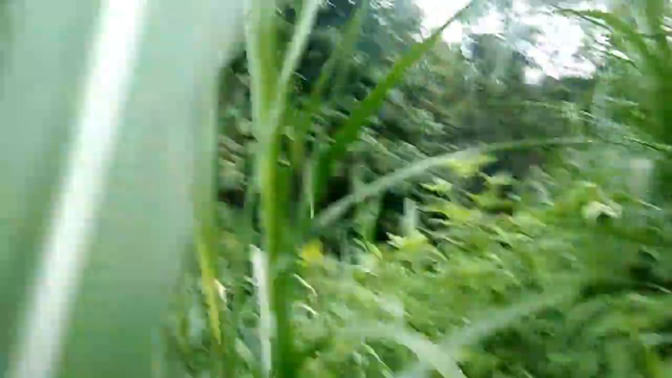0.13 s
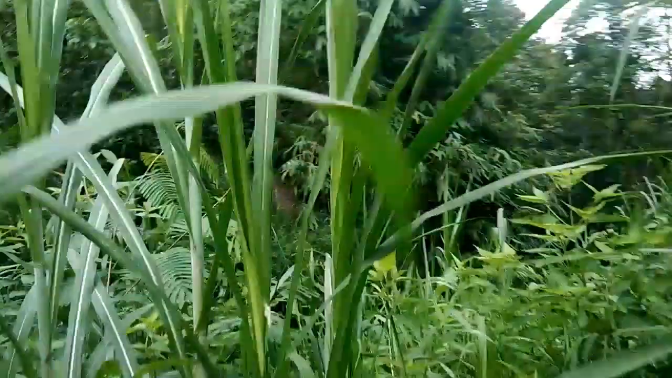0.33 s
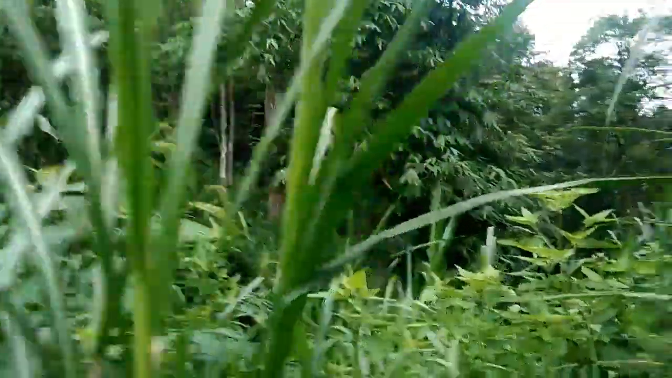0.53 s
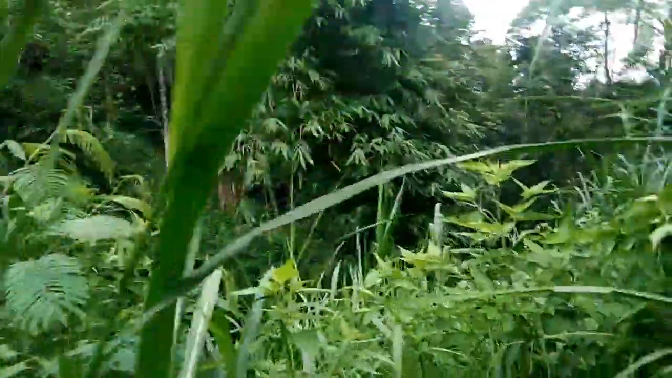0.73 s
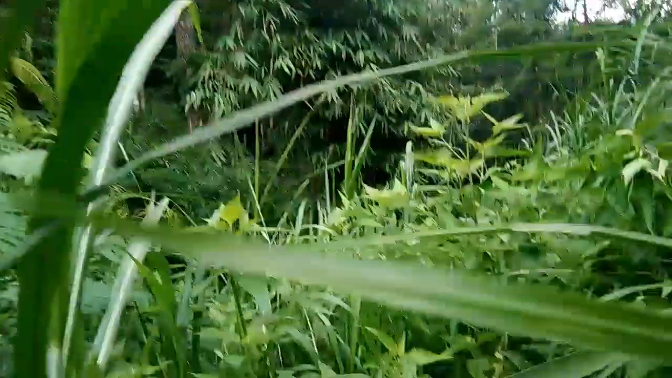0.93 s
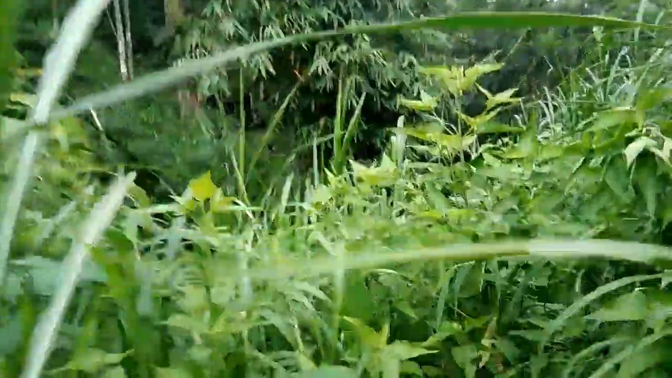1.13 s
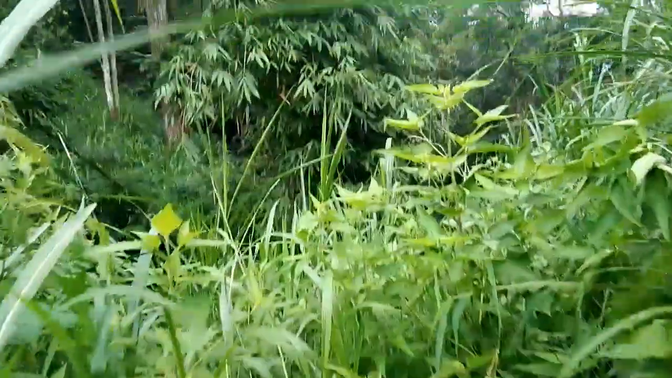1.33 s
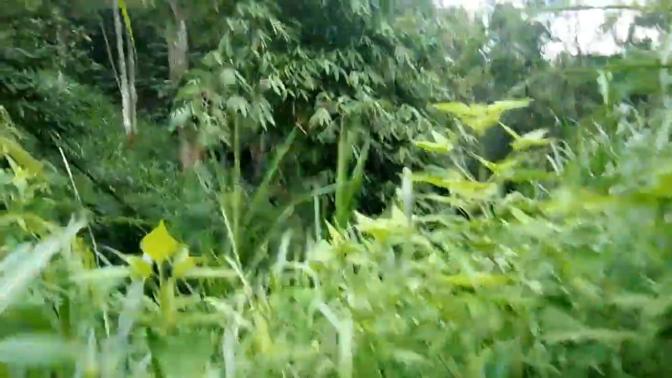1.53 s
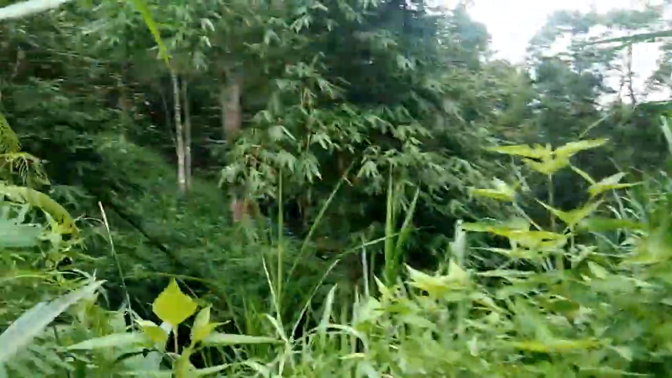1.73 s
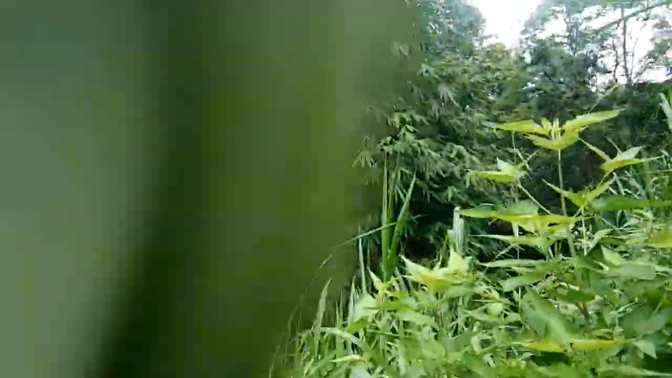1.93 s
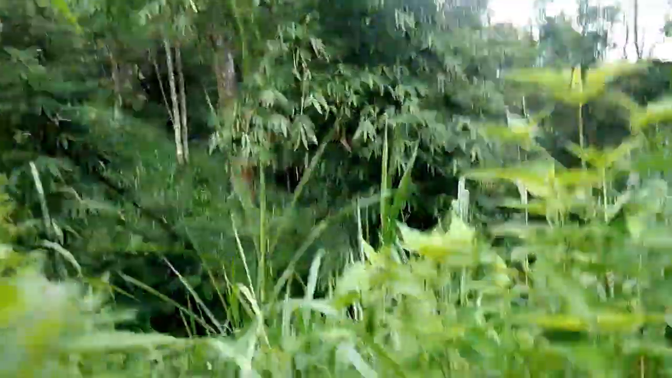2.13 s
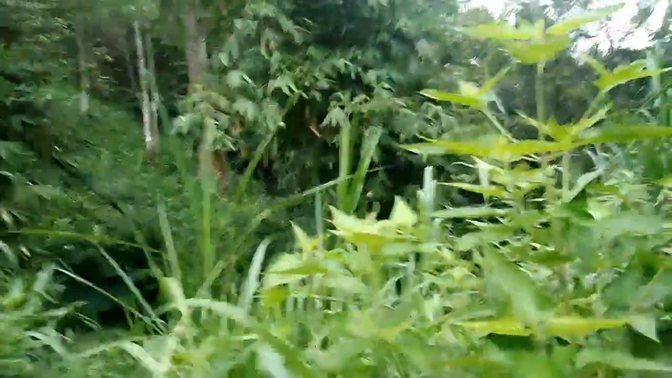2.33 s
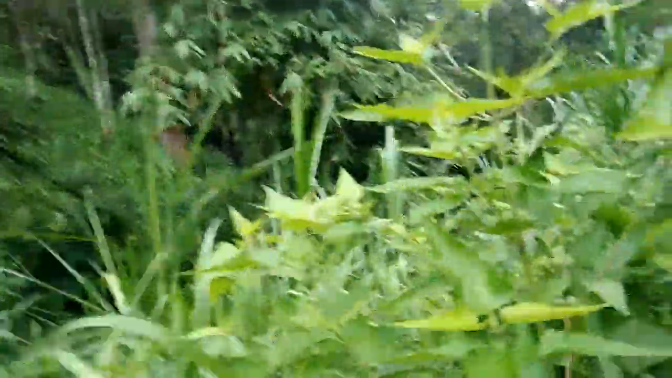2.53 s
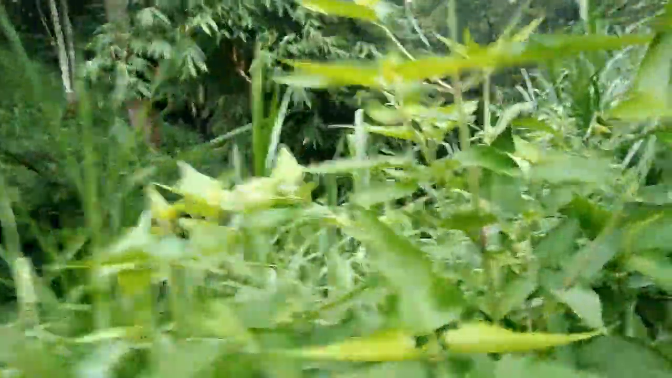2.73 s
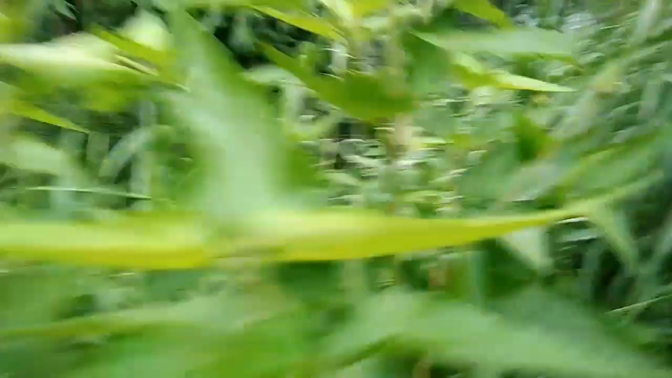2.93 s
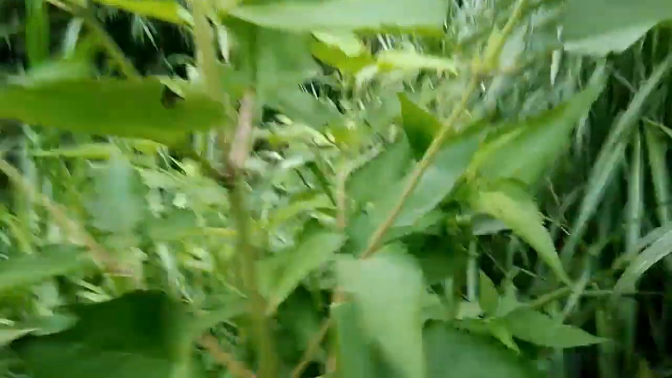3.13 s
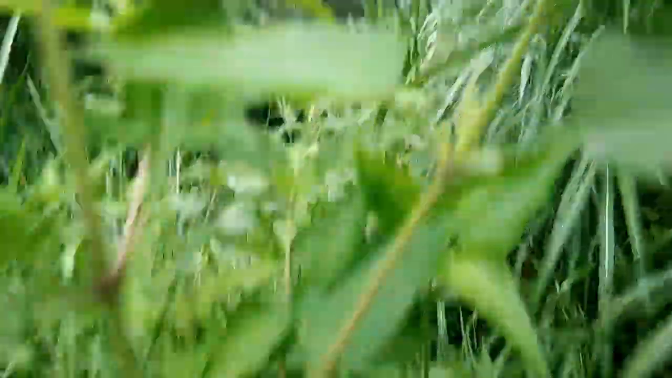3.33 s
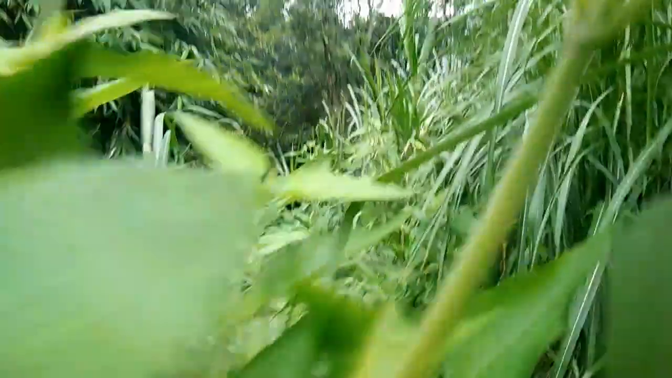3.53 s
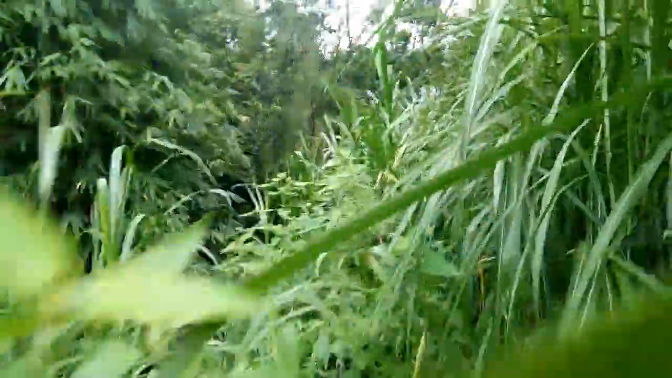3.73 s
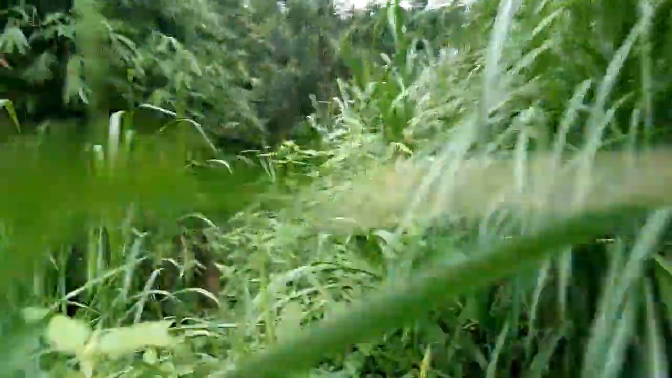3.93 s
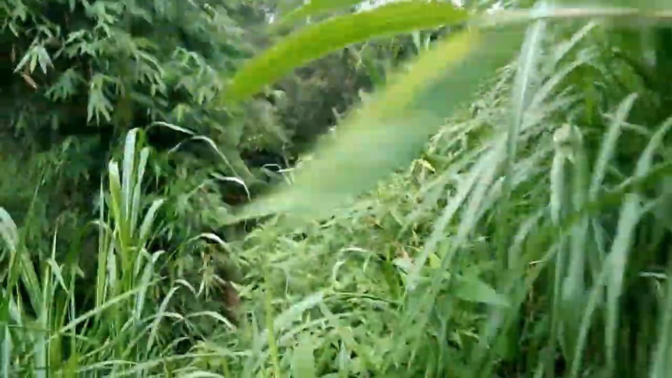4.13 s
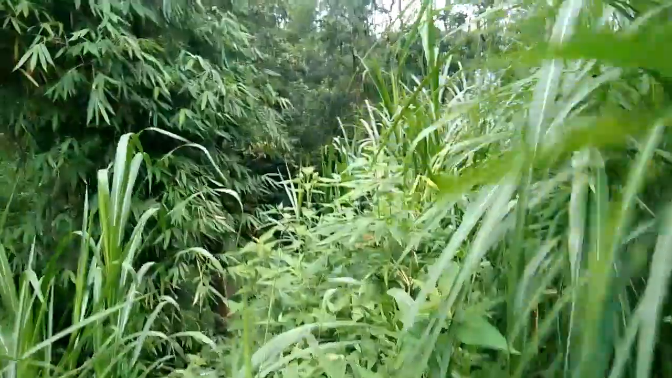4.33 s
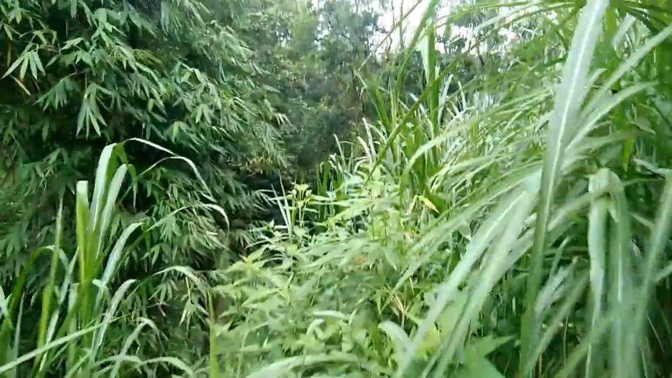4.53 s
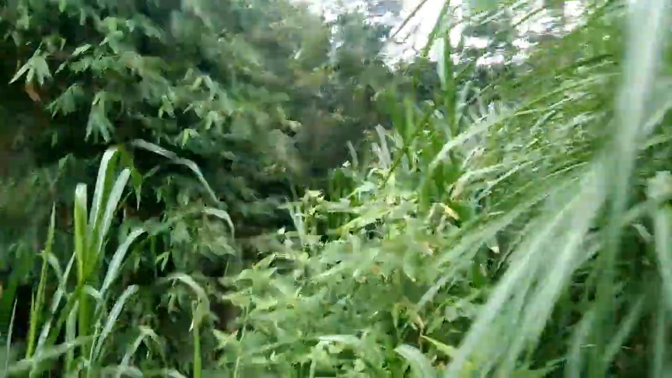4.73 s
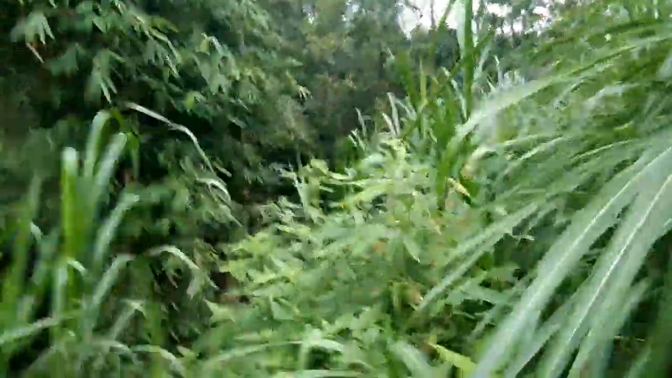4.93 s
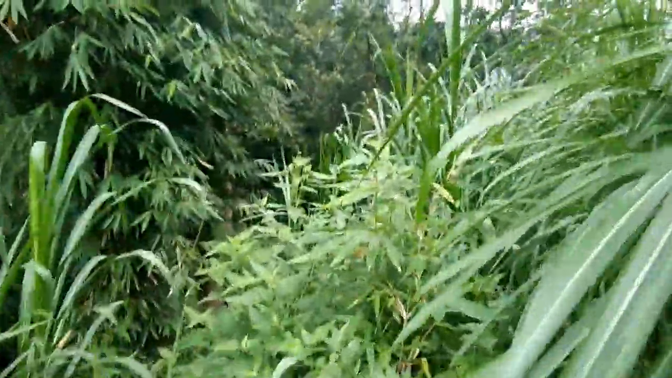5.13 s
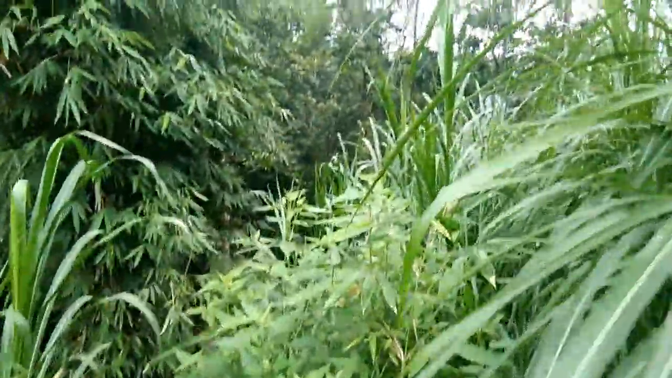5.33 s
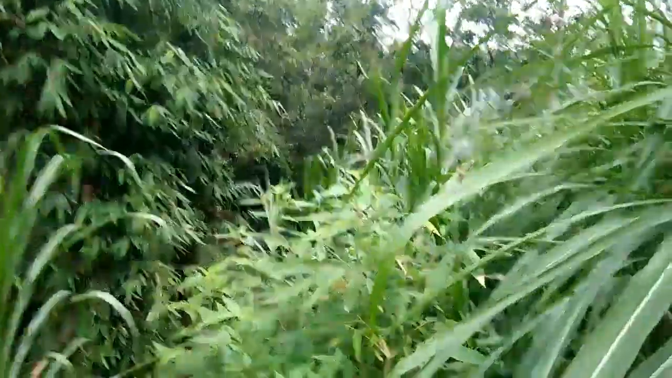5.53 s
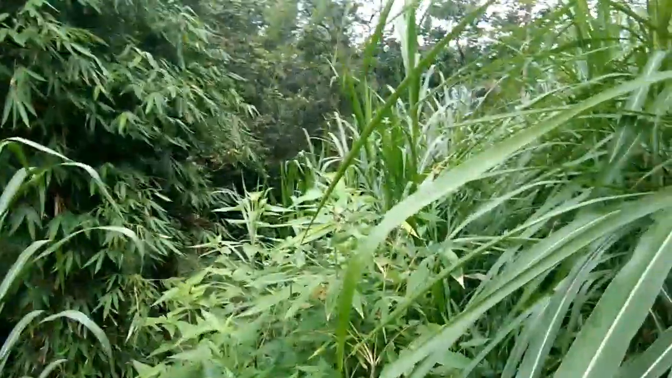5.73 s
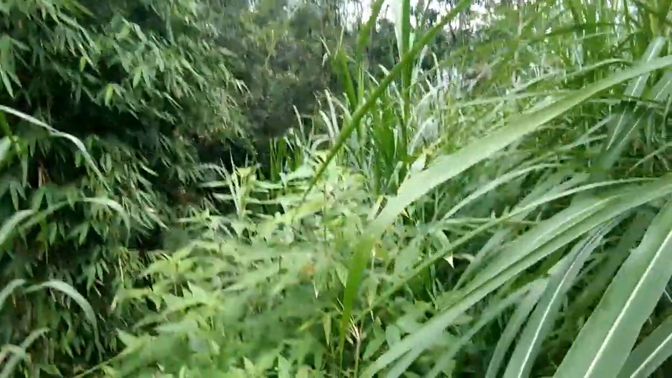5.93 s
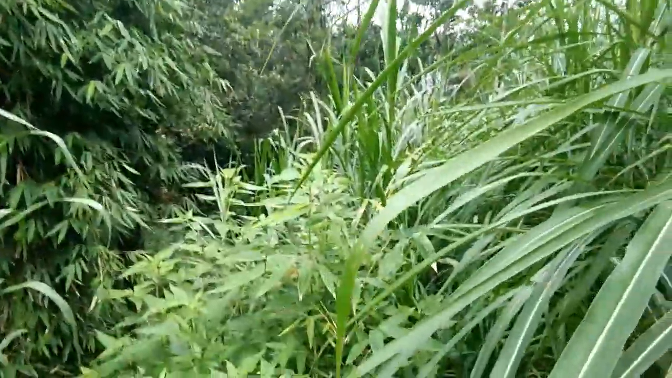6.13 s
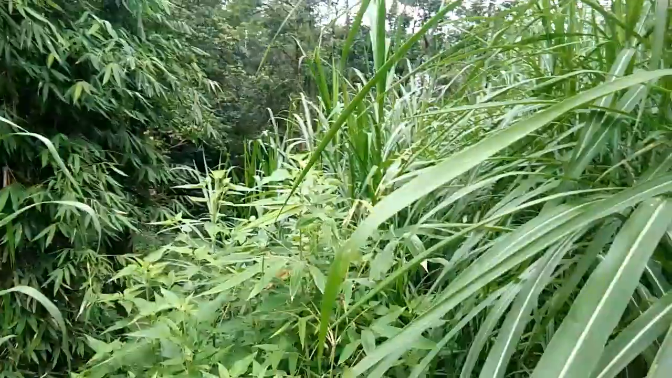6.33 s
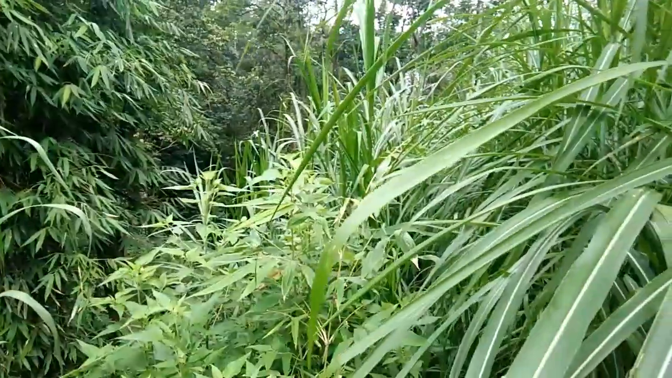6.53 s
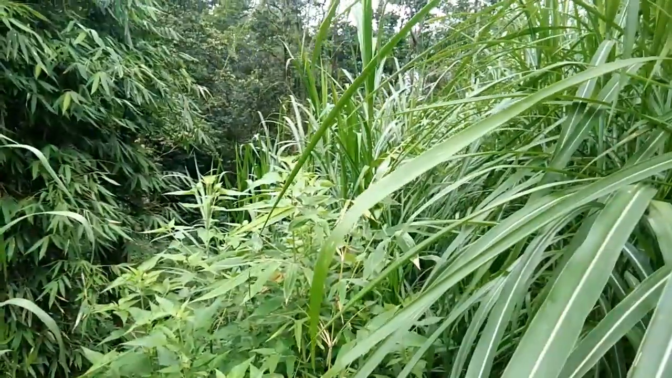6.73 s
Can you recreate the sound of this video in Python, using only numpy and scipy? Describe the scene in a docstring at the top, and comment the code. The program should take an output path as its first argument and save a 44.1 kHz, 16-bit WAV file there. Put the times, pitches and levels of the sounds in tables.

```python
"""A hissing, crackling rustle is heard first: a camera is pushed through tall grass and leafy undergrowth.
Stick-slip friction sounds as blades slide, broad leaves flap and stems drag; single blades snap or
scrape on the housing. Early on a stalk bumps the camera and a saw-edged blade zips over it. The rustle
fades out, ever faster, at the end. One microphone with a resonant port hears it all."""
import sys
import numpy as np
from scipy import signal
from scipy.fft import rfft, irfft, next_fast_len
from scipy.io import wavfile
from scipy.ndimage import uniform_filter1d, map_coordinates

SR = 44100
rng = np.random.default_rng(int(sys.argv[2]) if len(sys.argv) > 2 else 0)


def wrap_up_sound(samples):
    """Save the sound to the file named by the first command line argument, as 16-bit audio."""
    columns = np.atleast_2d(samples).T
    # keep every value between -1 and 1, then stretch to whole-number steps
    tamed = np.clip(columns, -1, 1)
    steps = np.round(tamed * 32767).astype(np.int16)
    wavfile.write(sys.argv[1], SR, steps)


N = 298292

# how hard the camera is pushed through the plants: t/s, effort/dB
PUSH_EFFORT = [(0, -39), (0.2, -35.5), (0.4, -37.5), (0.55, -39), (0.82, -41.5), (0.96, -37), (1.13, -36.5),
               (1.3, -38.2), (1.6, -34), (1.85, -34), (2.04, -33.5), (2.2, -34.5), (2.42, -32.5),
               (2.58, -35), (2.76, -38.5), (3.1, -40), (3.6, -41.5), (4.1, -41), (4.36, -42.5),
               (4.58, -41.5), (5.14, -43), (5.48, -40.5), (5.9, -44.5)]
# friction spectra of sliding blades, dry blades, broad leaves and stems: f/Hz, gain/dB
HISS_SPECTRUM = [(1500, -52), (3500, -12.5), (5300, -1.5), (9000, 3.5), (16000, -3)]
BLADE_SPECTRUM = [(700, -33), (1500, -9), (2400, -1.5), (3800, -1.5), (6000, -3), (12000, -23.5)]
LEAF_SPECTRUM = [(150, -31.5), (350, -3.5), (520, -2), (760, -1.5), (1200, 0), (2000, -3.5), (4000, -15.5)]
STEM_SPECTRUM = [(20, -7.5), (50, -12), (80, -2.5), (125, -1.5), (190, -0.5), (360, -0.5), (600, -4),
                 (1500, -27.5)]
# long blades sweeping along the housing: t/s, duration/s, hiss level/dB, crackle level/dB
BLADE_SWEEPS = [(0.055, 0.16, -37, -50), (.235, .11, -31, -35.5), (.58, 0.33, -42.5, -58),
                (1.01, 0.078, -38, -42), (1.492, 0.073, -36, -42), (1.752, 0.19, -30.5, -35),
                (2.35, 0.24, -33, -41.5), (2.864, .05, -38, -50), (3.16, 0.28, -47, -44.5),
                (3.76, 0.043, -43, -40.5), (4.07, 0.17, -48, -44.5), (4.5, .06, -42, -48),
                (4.7, .1, -45, -45), (5.209, 0.074, -36, -46), (5.315, 0.063, -35, -40.5),
                (5.449, 0.11, -35, -39.5), (5.728, 0.033, -36.5, -42.5), (5.905, 0.024, -40, -52),
                (6.185, 0.075, -51.5, -58), (6.362, 0.022, -52, -57), (6.443, 0.022, -73, -75)]
# leafy shoots bent aside: t/s, duration/s, leaf flap level/dB, stem drag level/dB
BENT_SHOOTS = [(0.218, .04, -45, -42), (0.293, 0.056, -30.5, -41), (.64, 0.24, -45, -51),
               (1.284, 0.072, -41, -62), (1.85, 0.26, -44, -48), (2.33, .03, -43, -48),
               (2.56, .06, -50, -48.5), (2.92, 0.12, -46, -52), (3.13, 0.26, -47, -53),
               (3.4, 0.26, -58, -55), (3.8, 0.13, -52, -64), (4.06, 0.12, -52, -54), (4.64, 0.25, -50, -69),
               (5.203, 0.084, -46, -64), (5.35, 0.022, -48, -53), (5.46, .1, -58, -64),
               (5.7, 0.03, -46, -62), (6.168, 0.024, -51, -71), (6.28, 0.024, -63, -77),
               (6.364, .012, -58.5, -80), (6.448, 0.019, -71.5, -84.5)]
# blades and leaves scraping the housing, plus two low rumbles near 110 Hz as stems drag past: t/s, duration/s,
# relative level/dB, f/Hz, quality factor Q
HOUSING_SCRAPES = [(.066, 0.009, -32, 8000, 0.6), (.133, 0.0078, -19, 10500, 0.58),
                   (.134, 0.006, -24.5, 2270, 2.5), (.141, 0.0059, -23, 9880, 1),
                   (0.279, .019, -27, 1300, 1.3), (.3314, .005, -15.5, 8430, 1.4),
                   (.338, .008, -21.5, 7100, 1), (0.336, .008, -23, 1550, 4),
                   (0.3653, 0.013, -26.5, 1378, 3), (.412, .022, -27.5, 766, 3),
                   (.413, 0.021, -30, 1800, 4.6), (.458, 0.042, -39, 110, 2.1),
                   (0.584, 0.029, -42, 110, 2.2), (2.077, .008, -29, 3300, 3.5),
                   (2.599, 0.072, -42, 553, 2.5), (3.136, 0.18, -46, 340, 3.7), (3.168, 0.12, -44, 1300, 3),
                   (3.849, 0.39, -50, 1250, 4.7), (4.671, 0.034, -40.5, 1290, 4.5),
                   (4.812, 0.022, -33, 11000, 2), (5.2, 0.2, -50.5, 420, 2.1),
                   (5.368, 0.022, -31, 8500, 0.77), (5.692, 0.012, -28.5, 11000, .64),
                   (5.712, 0.032, -44, 1300, 3), (5.778, 0.024, -33, 9000, 0.76),
                   (5.908, .0041, -24.5, 11000, 1.1)]
# blades flicking the housing: t/s, relative level/dB, f/Hz
BLADE_SNAPS = [(.0733, -26, 2800), (.4122, -20, 1840), (1.072, -26, 7920), (1.431, -21.5, 5300),
               (2.0757, -20.5, 3000), (2.159, -27, 6000), (2.258, -23, 5000), (2.345, -34, 882),
               (3.536, -31, 4470), (3.570, -31, 8040), (4.004, -29, 3430), (4.178, -30, 7010),
               (4.789, -30, 10000), (5.453, -28, 9000), (5.543, -23, 6000), (5.577, -26, 7000),
               (5.7768, -20.5, 10300), (5.920, -32, 4970), (6.1875, -39, 8900), (6.1878, -44.5, 1500),
               (6.364, -46, 11050), (6.530, -66.5, 9300)]
# a toothed blade edge drawn over the housing: t/s, tooth rate/Hz, relative level/dB
ZIP_STROKE = [(.4115, 420, -74.5), (.414, 400, -26.5), (.434, 440, -25.5), (.455, 530, -22.5),
              (.478, 430, -27.5), (.505, 480, -34), (.527, 210, -30.5), (.56, 220, -39), (.6, 340, -110)]
# response of the housing to those teeth: f/Hz, gain/dB
HOUSING_RESPONSE = [(60, -14), (120, -11.5), (220, 1.5), (480, -5), (900, -15), (2000, -16), (4000, -33),
                    (12000, -41)]
# stalks bumping the camera body: t/s, relative level/dB, f/Hz, decay to 1/e in cycles
STALK_BUMPS = [(0.3288, -12, 209, 0.56), (0.3397, -3.5, 260, 0.68), (.3435, -11.5, 547, 2.8),
               (.355, -22.5, 123, .99), (.368, -10.5, 610, 0.78), (.3706, -12.5, 850, 1.3),
               (.3745, -12.5, 857, 1.2), (3.682, -22.5, 520, 0.49), (3.685, -28.5, 130, 0.82),
               (4.427, -27.5, 317, 0.67), (6.1869, -42, 414, .93)]
# response of the microphone port: f/Hz, gain/dB
PORT_RESPONSE = [(15, -20), (45, 3.5), (80, 1.5), (8000, -0.5), (9200, 0.5), (10500, 4.5), (11200, 2),
                 (12300, -3.5), (13500, -4), (15500, -6.5)]

EASY_DB = -42  # effort of an easy, steady push
# each part of the rustle: level/dB at an easy push, dB gained per dB of effort
HISS_LAW, BLADE_LAW, LEAF_LAW, STEM_LAW = (-39, 1.0), (-43, 1.05), (-45.5, 0.85), (-55, 0.76)
FADE_START_S, FADE_DB, FADE_EXPONENT = 5.92, 72.5, 1.34  # FADE_DB is the loss after one second


def amp(db):
    """Amplitude ratio of a level: a factor of ten for every 20 dB."""
    return 10 ** (np.asarray(db) / 20)


def unit(x):
    """Normalisation to an rms value of 1."""
    return x / np.sqrt(np.mean(x ** 2) + 1e-20)


def curves(rows):
    """Linear interpolation in time: one value per sample for each column after the first."""
    times, *columns = np.transpose(rows)
    return [np.interp(np.arange(N) / SR, times, column) for column in columns]


def wobble(rate_hz):
    """Smooth random modulation: a spline through Gaussian values drawn at rate_hz."""
    knots = rng.standard_normal(int(N * rate_hz / SR) + 4)
    return map_coordinates(knots, [np.arange(N) * rate_hz / SR])


def coloured(x, response):
    """Minimum-phase filtering: folding the cepstrum gives a causal filter with the given gains."""
    size = next_fast_len(N + SR // 2)
    hz, db = np.transpose(response)
    gain = amp(np.interp(np.log(np.fft.rfftfreq(size, 1 / SR) + 1), np.log(hz), db))
    cepstrum = irfft(np.log(gain), size)
    cepstrum[1:size // 2] *= 2
    cepstrum[size // 2 + 1:] = 0
    return irfft(rfft(x, size) * np.exp(rfft(cepstrum)), size)[:N]


def resonant_noise(samples, hz, q):
    """A resonator driven by white noise passes a band around its natural frequency."""
    centre = min(hz, SR / 3)
    resonator = signal.iirpeak(centre, max(q, 3 * centre / SR), fs=SR)
    return unit(signal.lfilter(*resonator, rng.standard_normal(samples)))


def add(track, start_s, sound):
    """Superposition: a sound adds linearly to the track from its starting time."""
    part = track[max(round(start_s * SR), 0):][:len(sound)]
    part += sound[:len(part)]


def push_gain(law):
    """Power law: friction amplitude grows with effort; it falls ever faster in the final fade."""
    effort_db, = curves(PUSH_EFFORT)
    easy_level_db, growth = law
    fade_time = np.maximum(np.arange(N) / SR - FADE_START_S, 0)
    return amp(easy_level_db + growth * (effort_db - EASY_DB) - FADE_DB * fade_time ** FADE_EXPONENT)


def stroke_gains(rows, attack_s, release_s):
    """Exponential growth and decay: each contact rises, holds and releases; one gain per level column."""
    gains = np.zeros((2, N))
    for start, duration, *levels_db in rows:
        t = np.maximum(np.arange(N) / SR - start, 0)
        envelope = (1 - np.exp(-t / attack_s)) * np.exp(-np.maximum(t - duration, 0) / release_s)
        gains += np.outer(amp(levels_db), envelope)
    return gains


def rubbing(spectrum, slip_hz, scatter_db, clump_hz, clump_db):
    """Stick-slip friction: random impulses swell in clumps, filtered by the plant part that gives way."""
    slipping = rng.random(N) < slip_hz / SR
    slips = unit(slipping * rng.choice([-1, 1], N) * amp(scatter_db * rng.standard_normal(N)))
    clumps = amp(clump_db * wobble(clump_hz))
    return unit(coloured(slips * clumps, spectrum))


def crackle(pitch_hz, spread, cycles, scatter_db, count=2200, size=256):
    """Buckling: each small crease gives way and rings for a few cycles at its own frequency."""
    starts = rng.integers(0, N - size, count)
    detune, strength = np.clip(rng.standard_normal((2, count, 1)), -2, 2)
    turns = np.minimum(pitch_hz * np.exp(spread * detune), SR / 3) * np.arange(size) / SR
    rings = amp(scatter_db * strength) * np.sin(2 * np.pi * turns) * np.exp(-turns / cycles)
    positions = starts[:, None] + np.arange(size)
    return unit(np.bincount(positions.ravel(), rings.ravel(), N))


def undergrowth():
    """Incoherent addition: the steady push and single strokes sum in power to drive the rustle."""
    swish, crunch = stroke_gains(BLADE_SWEEPS, attack_s=0.0046, release_s=0.023)
    flap, drag = stroke_gains(BENT_SHOOTS, attack_s=0.0029, release_s=0.04)
    hiss_gain = np.hypot(push_gain(HISS_LAW), swish)
    blade_gain = np.hypot(push_gain(BLADE_LAW), crunch)
    leaf_gain = np.hypot(push_gain(LEAF_LAW), flap)
    stem_gain = np.hypot(push_gain(STEM_LAW), drag)
    grip = amp(0.56 * wobble(60))  # the grip of plant on plant changes quickly
    hiss = rubbing(HISS_SPECTRUM, slip_hz=14000, scatter_db=2.5, clump_hz=300, clump_db=1.1)
    blades = rubbing(BLADE_SPECTRUM, slip_hz=7000, scatter_db=1.5, clump_hz=140, clump_db=0.5)
    creases = amp(-9.0) * crackle(pitch_hz=5050, spread=0.55, cycles=2.3, scatter_db=3.5)
    leaves = rubbing(LEAF_SPECTRUM, slip_hz=3000, scatter_db=0.5, clump_hz=60, clump_db=0.5)
    stems = rubbing(STEM_SPECTRUM, slip_hz=1200, scatter_db=5.0, clump_hz=21, clump_db=0.5)
    foliage = hiss_gain * hiss + blade_gain * (blades + creases) + leaf_gain * leaves
    return grip * foliage + stem_gain * stems


def scrapes(attack_s=0.00083):
    """Forced vibration: friction drives a resonance as a blade or leaf catches, rasps and lets go."""
    track, t = np.zeros(N), np.arange(SR // 2) / SR
    for start, duration, db, hz, q in HOUSING_SCRAPES:
        rasp = resonant_noise(len(t), hz, q)
        grip = (1 - np.exp(-t / attack_s)) / (1 + (t / duration) ** 6)
        add(track, start, amp(db - 2.5) * grip * rasp)
    return track


def snaps(flick_db=1, cycles=3, shiver_t60_s=0.014):
    """Damped free vibration: a released blade strikes with a few sharp cycles, then shivers out."""
    track, t = np.zeros(N), np.arange(SR // 10) / SR
    for start, db, hz in BLADE_SNAPS:
        flick = amp(flick_db) * np.sin(2 * np.pi * hz * t) * np.exp(-hz * t / cycles)
        shiver = resonant_noise(len(t), hz, q=2.0) * amp(-60 * t / shiver_t60_s)
        add(track, start, amp(db + 1.5) * (flick + shiver))
    return track


def blade_zip():
    """Repetition pitch: a blade's teeth tick over the housing in a buzz that falls as the blade slows."""
    tooth_hz, db = curves(ZIP_STROKE)
    teeth_passed = np.cumsum(tooth_hz * (1 + 0.067 * wobble(250))) / SR
    ticks = np.diff(np.floor(teeth_passed), prepend=0) * amp(3 * wobble(400))
    running_mean = uniform_filter1d(ticks, SR // 100)
    buzz = coloured(ticks - running_mean, HOUSING_RESPONSE)
    return amp(db - 4) * unit(buzz)


def bumps(cutoff_hz=85):
    """Impact excitation: a stalk gives the camera body a heavily damped oscillation and a dull shudder."""
    track, t = np.zeros(N), np.arange(SR // 8) / SR
    for start, db, hz, cycles in STALK_BUMPS:
        decay = np.exp(-hz * t / cycles)
        thud = np.sin(2 * np.pi * hz * t) * decay
        shudder = resonant_noise(len(t), hz, q=0.32) * decay ** 0.31
        add(track, start, amp(db) * (thud + 0.14 * shudder))
    # the hand yields to slow pressure, so the deepest bass is lost
    return signal.sosfilt(signal.butter(2, cutoff_hz, "highpass", fs=SR, output="sos"), track)


def scene():
    """Superposition at one point: all sources sum at one microphone, the same in both channels."""
    mono = undergrowth() + snaps() + scrapes() + bumps() + blade_zip()
    return np.array([mono, mono])


def record(dry):
    """Port resonance: the microphone rings in the high treble, and a band limit cuts off the very top."""
    limit_hz, edge_hz = 15750, 150
    heard = np.array([coloured(channel, PORT_RESPONSE) for channel in dry])
    size = next_fast_len(N + SR // 2)
    passband = np.clip((limit_hz - np.fft.rfftfreq(size, 1 / SR)) / edge_hz + 0.5, 0, 1)
    return irfft(rfft(heard, size) * passband, size)[:, :N]


dry = scene()
out = record(dry)
wrap_up_sound(out)
```